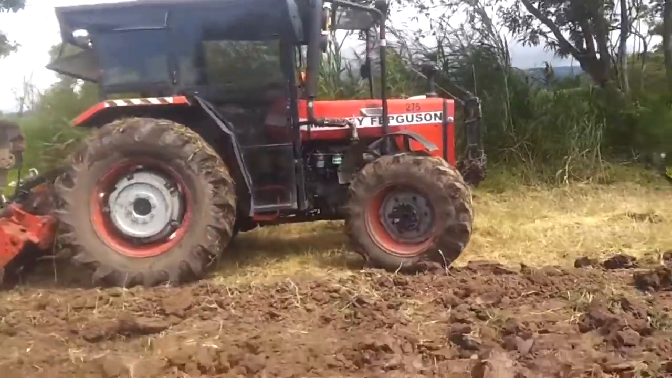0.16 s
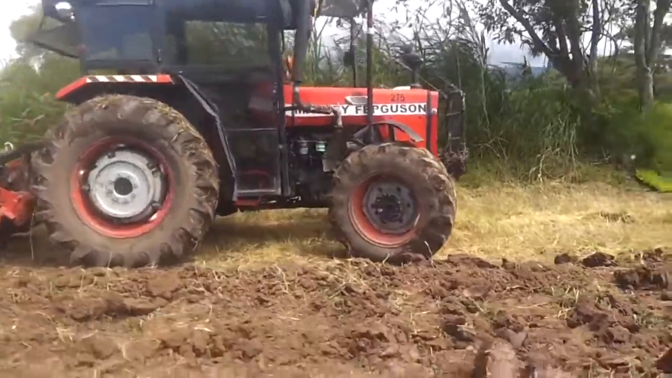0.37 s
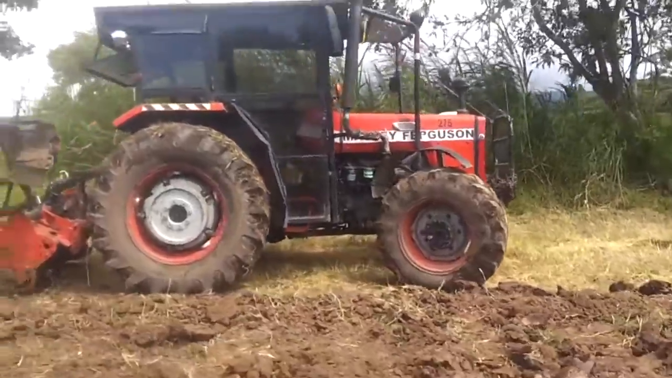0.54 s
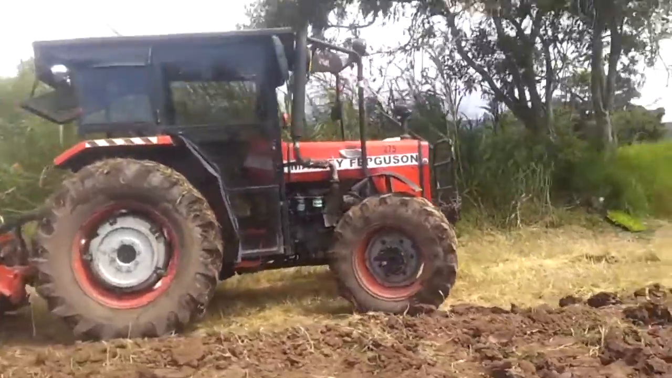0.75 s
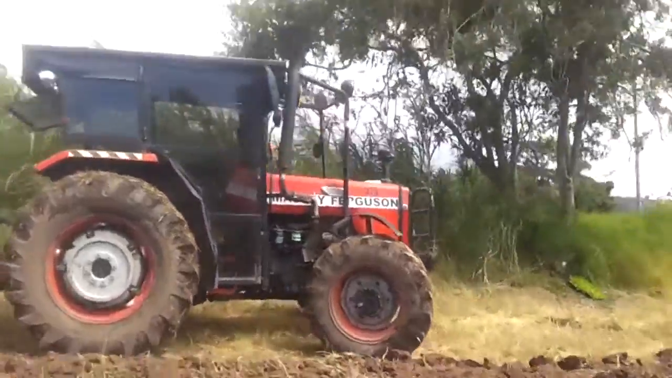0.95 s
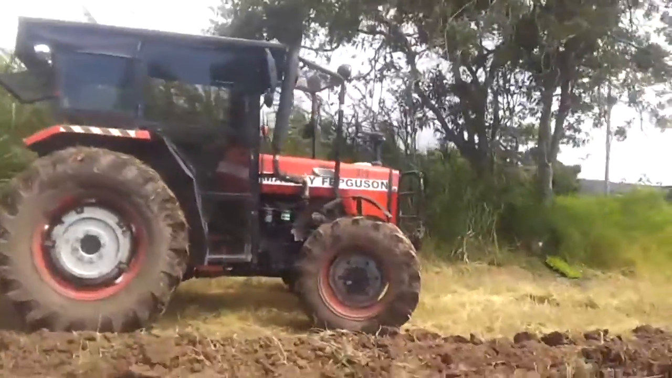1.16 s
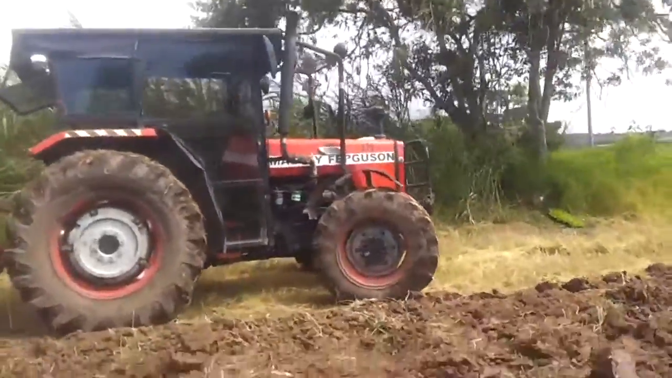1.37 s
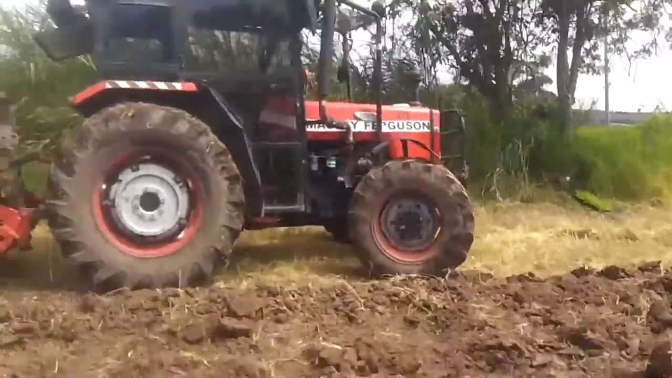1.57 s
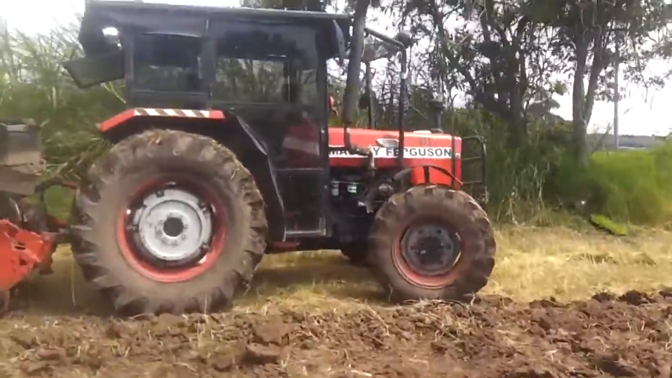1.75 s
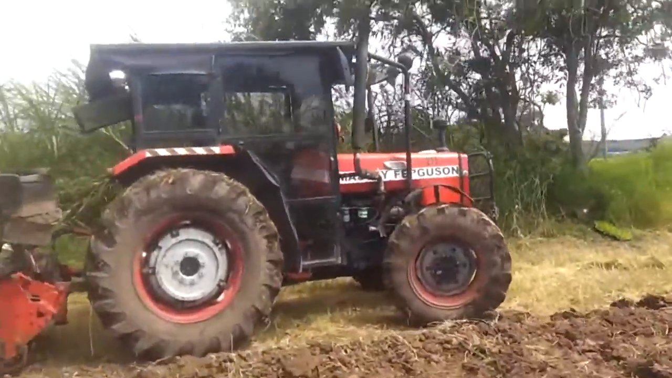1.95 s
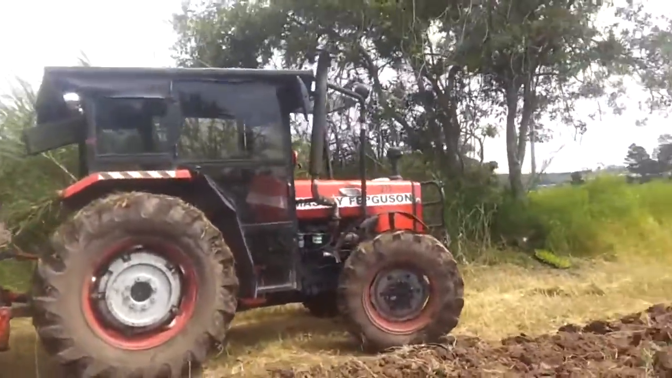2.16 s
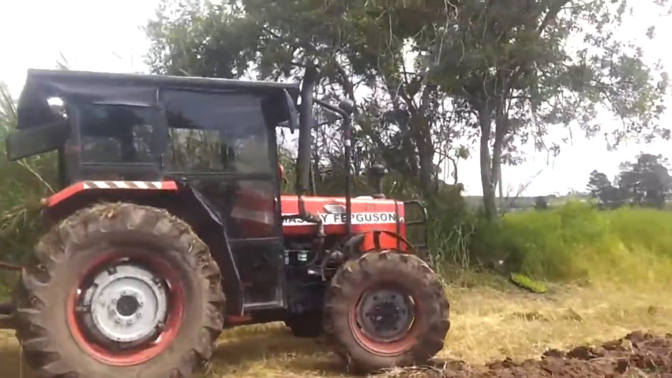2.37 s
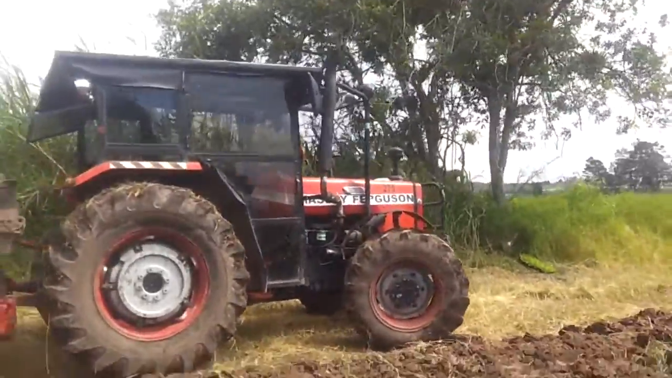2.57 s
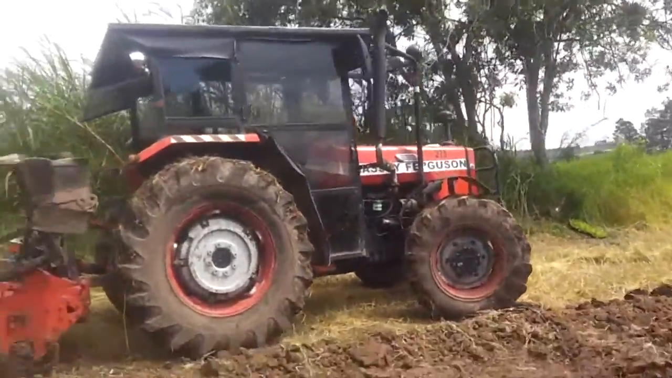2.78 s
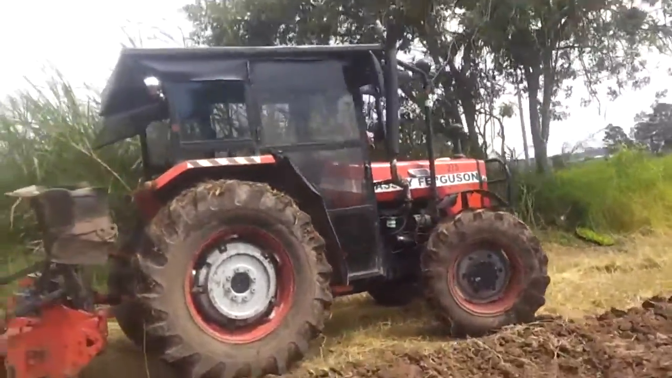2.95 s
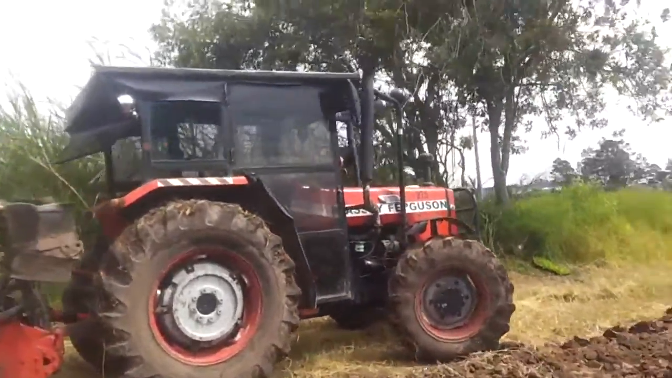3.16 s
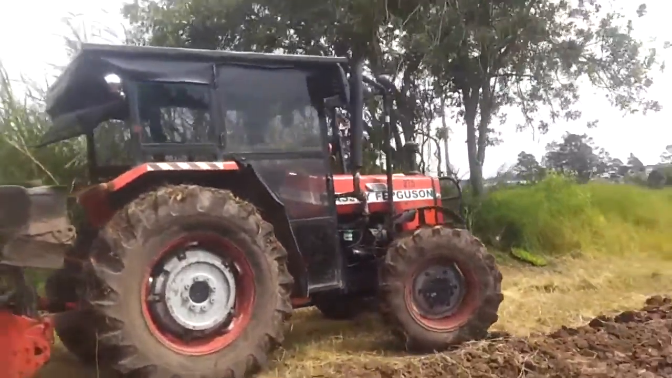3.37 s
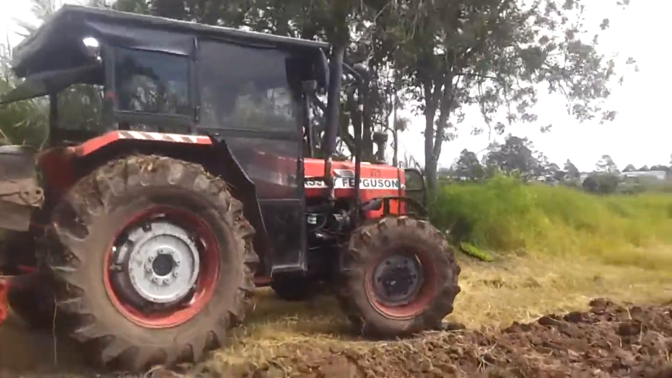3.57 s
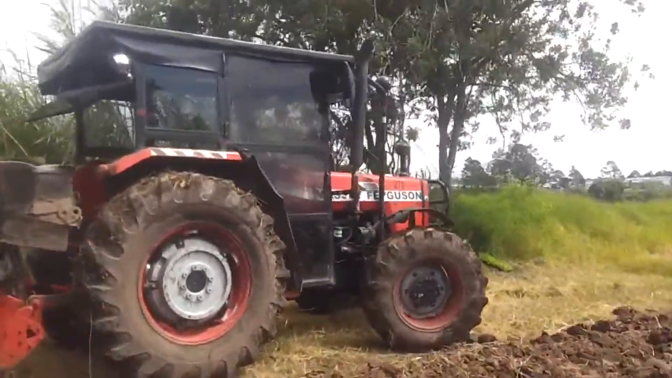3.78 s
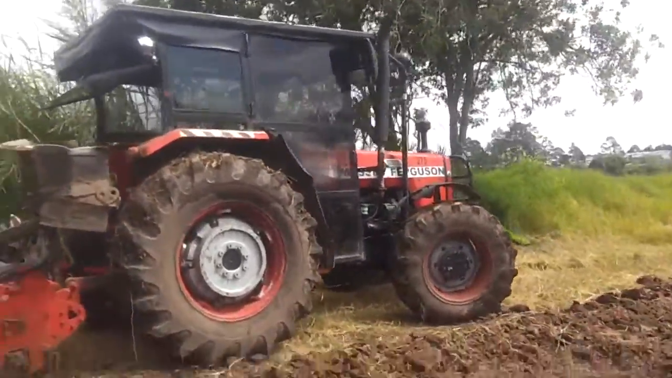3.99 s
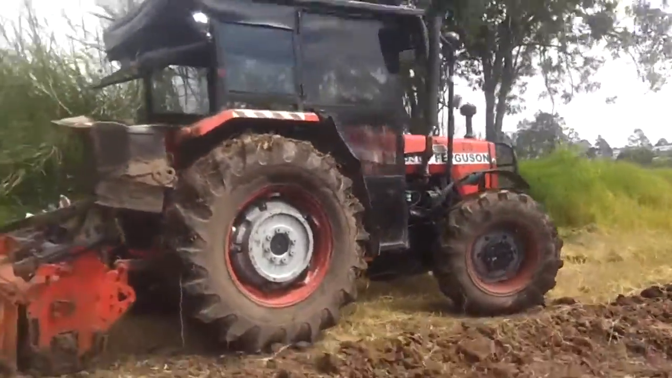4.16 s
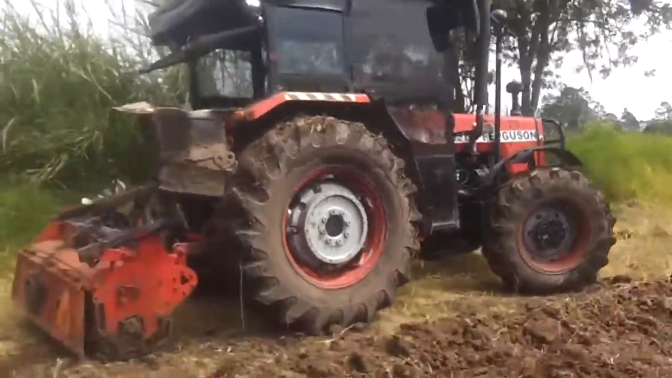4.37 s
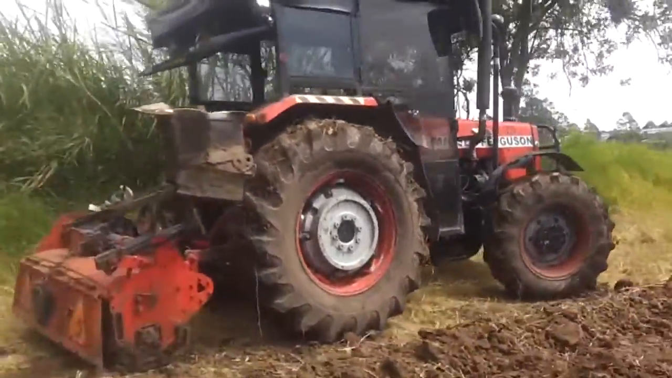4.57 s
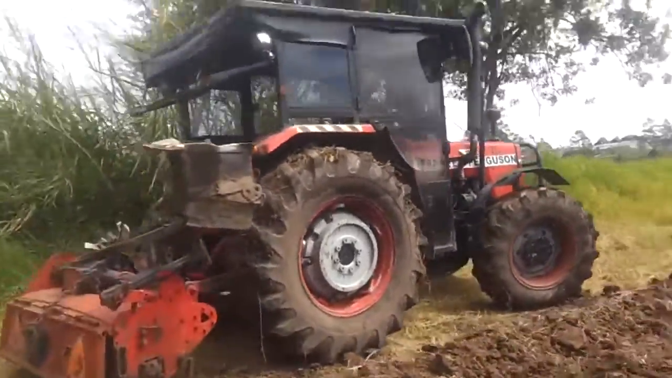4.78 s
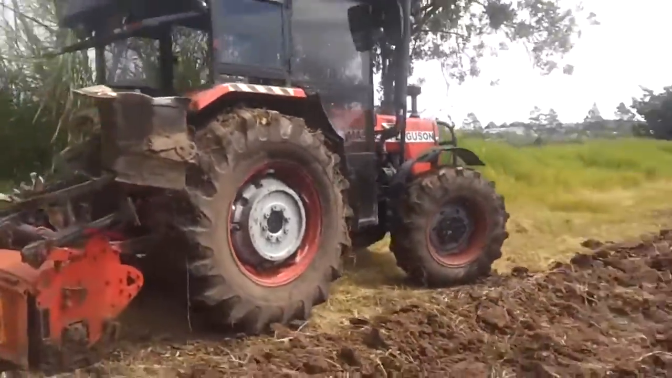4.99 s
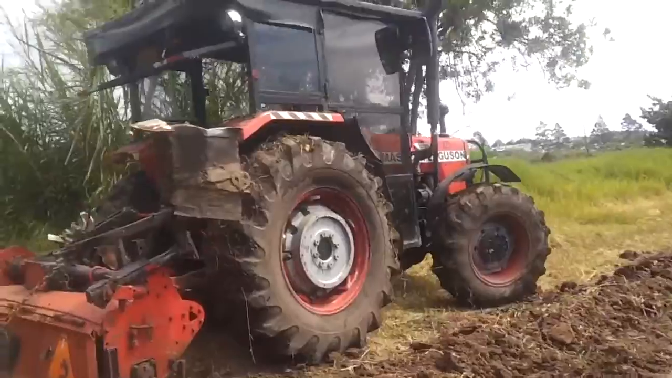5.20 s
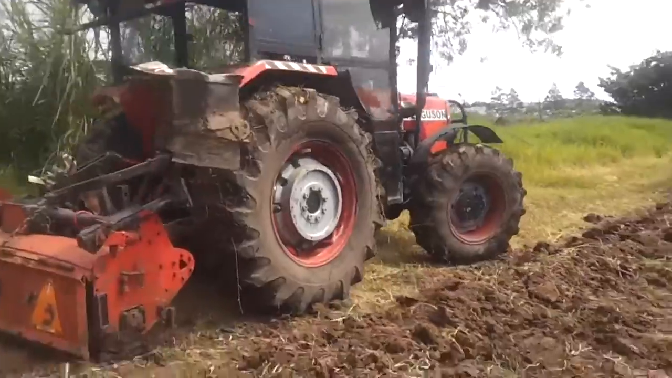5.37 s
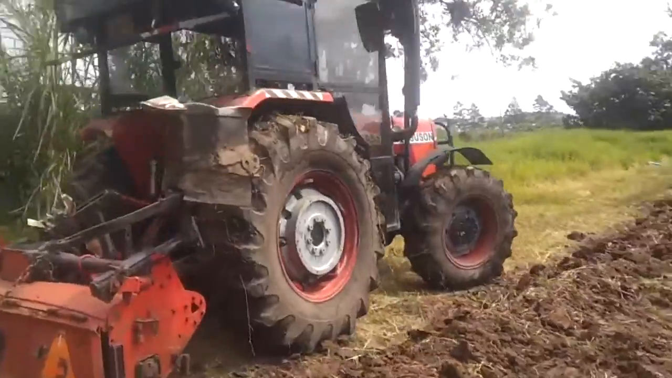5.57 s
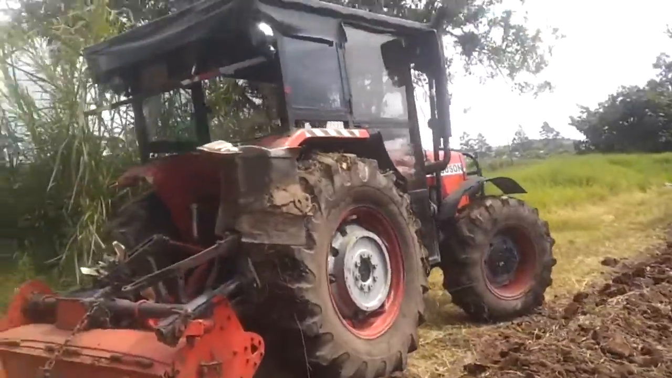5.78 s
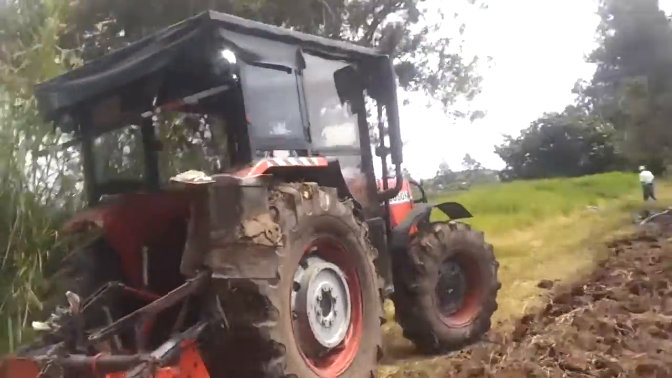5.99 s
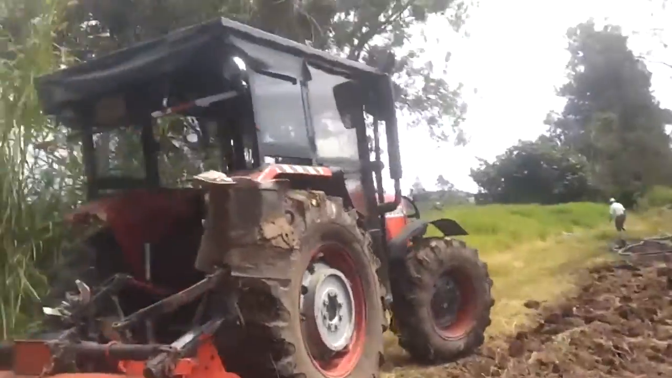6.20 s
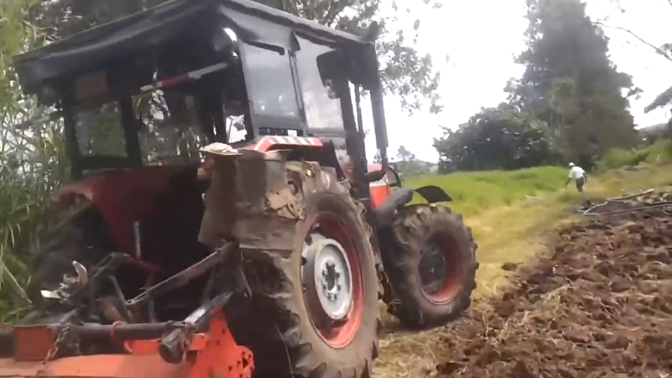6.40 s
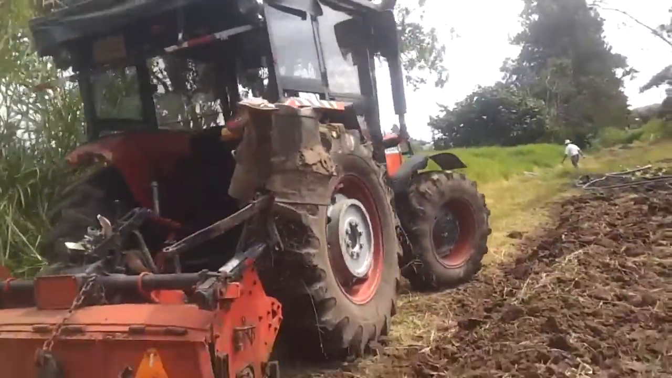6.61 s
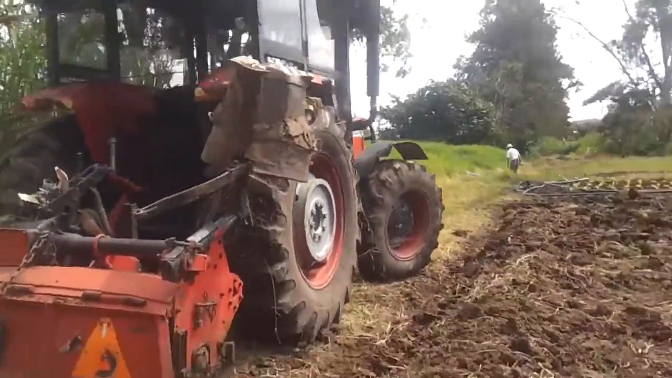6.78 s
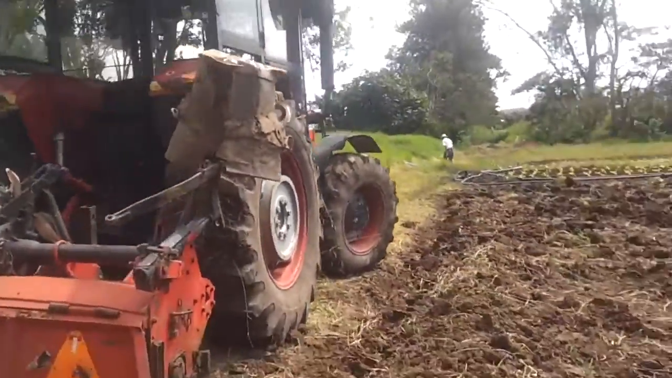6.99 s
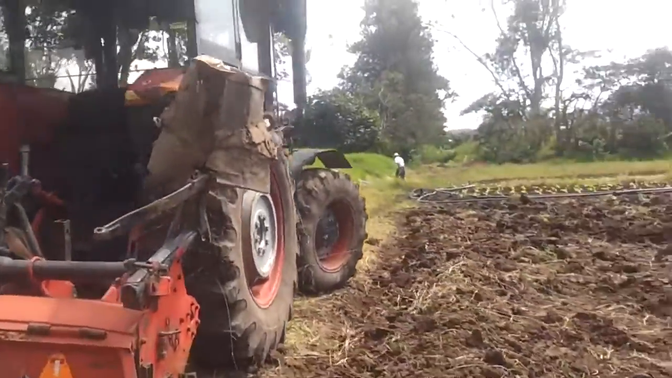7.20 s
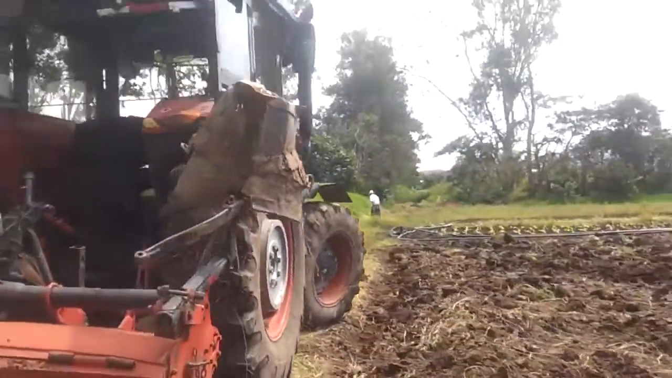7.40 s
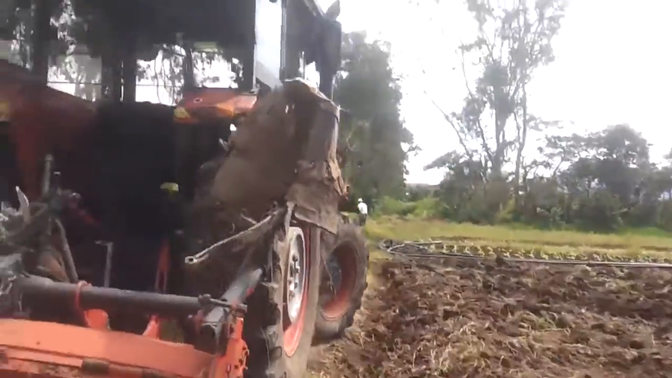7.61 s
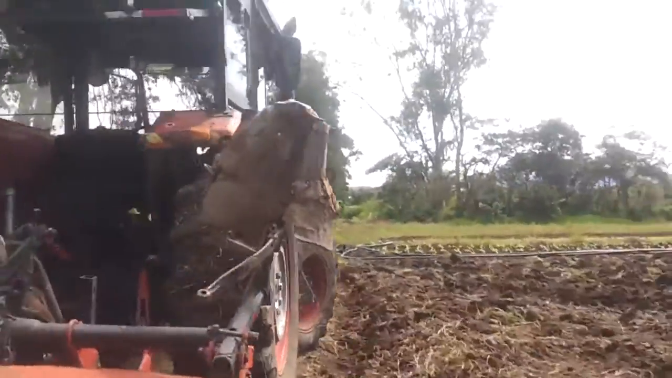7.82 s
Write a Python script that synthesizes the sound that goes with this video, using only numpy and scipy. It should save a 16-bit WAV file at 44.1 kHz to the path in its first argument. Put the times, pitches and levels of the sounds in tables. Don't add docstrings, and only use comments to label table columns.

```python
import sys
import numpy as np
from scipy import signal
from scipy.fft import rfft, irfft, next_fast_len
from scipy.io import wavfile
from scipy.ndimage import uniform_filter1d, map_coordinates

SR = 44100
rng = np.random.default_rng(int(sys.argv[2]) if len(sys.argv) > 2 else 0)


def ratio(d):
    e = np.asarray(d, float) / 20
    return 10 ** e


def master(y):
    cut = np.clip(np.atleast_2d(y).T, -1, 1)
    pcm = np.round(cut * 32767)
    wavfile.write(sys.argv[1], SR, pcm.astype(np.int16))


N = 346185

# f/Hz, left-right likeness/1
PORT_LIKENESS = [(60, .55), (130, .75), (280, .95), (620, .6), (1200, .7), (2200, .65), (4000, .5),
                 (8000, .25), (14000, .05)]
# f/Hz, level/dB per Hz
BUFFET_SPECTRUM = [(12, -54), (20, -31.5), (151, -0.5), (221, 1), (354, -6.5), (921, -24.5), (1050, -22.5),
                   (1350, -30.5), (1500, -35), (1950, -30), (3300, -120)]
# start t/s, length/s, level/dB, deep rumble over it/dB
LEFT_GUSTS = [(0, 0.066, -15, -9), (.16, 0.066, -18.5, 2), (.26, 0.12, -15, 2.5), (.41, 0.12, -21.5, -1),
              (.47, 0.17, -17, -10), (.68, 0.18, -19.5, -11), (.86, 0.18, -22.5, -9), (1.08, 0.22, -17, -9),
              (1.3, .12, -17, -4), (1.44, 0.095, -28.5, 13), (1.555, 0.22, -18.5, -3), (1.8, 0.36, -25, -3),
              (1.92, 0.074, -28, -29), (2.27, 0.25, -22.5, 6), (2.49, 0.24, -21, 2.5), (2.76, 0.18, -23, 4),
              (2.96, 0.1, -21.5, 4.5), (3.13, 0.077, -18, 2), (3.24, 0.029, -18, 2),
              (3.3, 0.12, -26.5, -11), (3.54, 0.27, -23.5, 7), (3.79, 0.19, -26, 8), (3.97, 0.18, -28, 1),
              (4.17, 0.064, -25.5, 0), (4.31, 0.073, -26, 6.5), (4.46, 0.18, -31, 4),
              (4.65, 0.088, -31.5, 3), (4.8, 0.081, -26.5, -4), (4.95, 0.093, -33, 7.5),
              (5.14, 0.048, -36, -8)]
RIGHT_GUSTS = [(.12, 0.11, -37, -1), (.28, 0.092, -34, -7), (.4, 0.093, -27.5, 0), (.54, 0.47, -27, -15),
               (1.0, 0.14, -34, 2), (1.26, 0.24, -34.5, -3), (1.55, 0.14, -32.5, -41),
               (1.75, 0.093, -28.5, -6), (1.89, 0.075, -27, -10), (2.05, 0.36, -28.5, -6),
               (2.45, 0.061, -25.5, -1), (2.56, 0.35, -29.5, -7), (2.97, 0.31, -31, -5),
               (3.28, 0.14, -33.5, 4), (3.47, 0.15, -33.5, 3), (3.7, 0.29, -29, -9), (3.96, 0.13, -30, -6),
               (4.18, 0.13, -24.5, -7), (4.33, .08, -39, 9), (4.44, 0.17, -45, 16), (4.6, 0.25, -34.5, -5)]
# t/s, peak level/dB, f/Hz
LEFT_POPS = [(0.02, -5, 510), (0.111, 3, 815), (0.29, -4, 305), (0.515, -6, 363), (0.548, 1.5, 563),
             (0.609, -2, 427), (0.713, -6.5, 338), (0.832, -5.5, 380), (1.12, -1, 303), (1.156, -5, 338),
             (1.192, 6, 335), (1.236, -11, 370), (1.256, 7, 550), (1.326, -1.5, 950), (1.456, 2.5, 227),
             (1.476, -0.5, 550), (1.561, -2, 420), (1.732, -6, 387), (2.53, -3, 307), (2.581, -4.5, 365),
             (2.87, -2.5, 307), (2.902, -4, 400), (2.993, -5.5, 263), (3.255, -7, 260), (3.568, -7, 263),
             (3.696, -4.5, 340), (3.808, -7, 426), (3.922, -5, 504), (4.193, -7.5, 311), (4.889, -3.5, 547)]
RIGHT_POPS = [(0.44, -9, 348), (0.463, -10, 291), (0.652, -10.5, 367), (0.749, -10, 302), (1.28, -22, 345),
              (1.933, -11.5, 373), (2.199, -14.5, 440), (3.428, -5.5, 390), (3.724, -9, 315),
              (3.88, -9, 295), (4.051, -15, 278), (4.225, 1, 274), (4.274, -12.5, 371), (4.358, -10.5, 270),
              (4.494, -10, 230)]
# t/s, peak level/dB, f/Hz
LEFT_EDDIES = [(0.071, -8, 320), (0.12, -8, 520), (0.178, -7, 292), (0.205, -10.5, 420), (0.27, -9, 460),
               (0.301, -12, 302), (0.324, -15, 368), (0.345, -10, 258), (0.362, -15, 400),
               (0.381, -10, 490), (0.425, -11.5, 417), (0.458, -12, 370), (0.5, -6.5, 350),
               (0.636, -7.5, 290), (0.727, -4.5, 420), (0.812, -9, 347), (0.989, -12.5, 330),
               (1.142, -9, 420), (1.18, -10, 400), (1.209, -2, 385), (1.273, -4, 480), (1.354, -7.5, 380),
               (1.368, -13, 250), (1.404, -6.5, 308), (1.492, -11, 410), (1.514, -12, 370),
               (1.594, -10.5, 280), (1.653, -6, 445), (1.665, -7, 533), (1.693, -9, 324), (1.77, -8, 298),
               (2.014, -15, 300), (2.279, -15, 260), (2.307, -9, 270), (2.327, -12, 300),
               (2.356, -7.5, 310), (2.41, -10, 318), (2.431, -9.5, 310), (2.51, -9, 260), (2.546, -11, 430),
               (2.559, -7.5, 312), (2.606, -11.5, 460), (2.649, -9.5, 297), (2.709, -15, 304),
               (2.729, -4, 372), (2.839, -11, 270), (2.93, -12, 260), (3.026, -13, 330), (3.059, -10, 316),
               (3.165, -8, 240), (3.178, -11, 294), (3.641, -10, 312), (3.67, -10, 310), (3.735, -9.5, 250),
               (3.757, -10, 300), (3.904, -11, 370), (4.065, -14, 316), (4.534, -15, 240)]
RIGHT_EDDIES = [(0.164, -20, 300), (0.475, -14, 280), (0.587, -25, 290), (0.734, -22, 370),
                (0.766, -17, 340), (0.883, -22, 330), (0.902, -16, 290), (1.357, -17, 390),
                (1.392, -19, 300), (1.612, -18, 330), (1.753, -22, 270), (2.082, -20, 340),
                (2.128, -20, 362), (2.166, -20, 230), (2.184, -20, 370), (2.336, -20, 320),
                (2.457, -17, 330), (2.496, -13, 330), (2.596, -24, 290), (2.614, -15, 300),
                (2.669, -18, 310), (2.73, -13, 373), (2.763, -18, 330), (2.787, -17, 290),
                (2.901, -19, 290), (3.149, -19, 320), (3.217, -19, 280), (3.309, -19, 370),
                (3.845, -17, 260), (3.907, -15, 390), (3.988, -19, 390), (4.202, -14, 330),
                (4.213, -14, 320), (4.512, -16, 330), (4.689, -21, 270), (4.819, -15.5, 290)]
# t/s, peak level/dB, f/Hz
LEFT_SNAPS = [(.167, -15, 1000), (.271, -11, 800), (.342, -10, 1800), (.425, -13, 800), (1.654, -10, 750),
              (2.606, -13, 750), (3.72, -14, 750), (1.316, -6, 2600), (1.326, -4, 2600), (1.354, -19, 900),
              (1.453, -12, 1200), (1.476, -14, 1300), (3.922, -9, 1300), (4.888, -16, 1500)]
# t/s, half length/s, level/dB, port (0 left, 1 right)
OVERLOAD_BLASTS = [(0.116, 0.016, -1, 0), (0.291, 0.019, -17, 0), (0.343, 0.0077, -3, 0),
                   (0.539, 0.0061, -1.5, 0), (0.612, 0.005, -7, 0), (0.728, 0.015, -10, 0),
                   (1.145, 0.027, -12, 0), (1.19, 0.012, 1.5, 0), (1.232, 0.011, -5, 0),
                   (1.255, 0.0078, 6, 0), (1.318, 0.0073, -3.5, 0), (1.488, 0.039, -15.5, 0),
                   (1.563, 0.016, -11, 0), (3.909, 0.029, -12, 0), (4.213, 0.013, -14.5, 1),
                   (0.432, 0.012, -14, 1)]
# f/Hz, level/dB per Hz
BLAST_SPECTRUM = [(60, -73), (200, 4), (400, 7.5), (800, -2.5), (1500, -13.5), (3000, -29), (6000, -48)]
# t/s, turns gained on a steady rate/1
CRANK_LAG = [(0, -0.18), (2, -0.34), (4, -0.35), (5.5, -0.4), (7, -.62), (7.85, -0.54)]
# t/s, exhaust level/dB, ringing/dB, soil hiss/dB, block over clatter/dB
TURNING_AWAY = [(0, -49, -3.5, -2.5, 7.5), (1.5, -42.5, 2, -2, 3.5), (3, -47, -2.5, -1.5, 5),
                (3.7, -39.5, -3.5, -2, 4.5), (4.3, -45.5, -5, 0, 8), (5, -40.5, -5.5, 0.5, 6.5),
                (5.5, -41.5, -10, 1, 6.5), (6.5, -41, -14, 0.5, 6.5), (7.2, -43.5, -7, 2, 8),
                (7.85, -40, -7, -1.5, 5)]
# t/s, clatter level/dB
PASSING_LEVEL = [(0, -46.5), (.7, -41), (1.5, -42), (2.4, -39), (3.4, -39.5), (4.5, -41), (5.3, -41),
                 (5.9, -41.5), (6.9, -41.5), (7.85, -40.5)]
# t/s, level/dB
CLATTER_SWINGS = [(.25, 5.5), (.47, 4.5), (.81, 5), (1.07, 4.5), (1.45, 3.5), (1.93, 2), (2.2, -2),
                  (2.32, 1.5), (2.82, 1.5), (2.93, -2.5), (3.28, 0.5), (3.6, 0.5), (3.72, -2), (4.25, -0.5),
                  (4.5, 1.5), (4.7, 2), (4.86, -4), (5.02, -1), (5.12, 0), (5.25, 1.5), (5.88, -0.5),
                  (6.6, 0), (7.02, 0.5), (7.12, -1.5), (7.24, 0), (7.53, 1)]
# f/Hz, level/dB per Hz
EXHAUST_SPECTRUM = [(18, -69), (30, -68), (68, -12.5), (129, -15.5), (256, -8), (293, -5.5), (356, -2.5),
                    (488, -10.5), (600, -8.5), (800, -11.5), (1040, -65), (1760, -120)]
BLOCK_SPECTRUM = [(350, -37), (600, -17), (654, -6), (748, -30), (804, -1.5), (857, -3.5), (1050, -6),
                  (1170, -8), (1390, -5.5), (1510, -6), (2100, -5), (2600, -11), (3300, -14.5), (4290, -20),
                  (7260, -120)]
CLATTER_SPECTRUM = [(1590, -8), (2700, 0), (3280, -5), (3640, -0.5), (4500, -1), (6470, 0), (9120, -6.5),
                    (12000, -20), (15600, -35), (22000, -120)]
# f/Hz, level/dB per Hz
HISS_SPECTRUM = [(1590, -7), (2700, -15), (3240, -6), (4000, -4), (4290, -2), (5480, -2.5), (7620, -2),
                 (13300, -14.5), (14400, -16)]
# f/Hz, width/Hz, side level/dB, rear level/dB, left minus right/dB, every second turn/dB
STEEL_MODES = [(1050, 65, -11, 3, -4, 6), (1430, 70, -8, -11, -3, 0), (1680, 70, -13, -6, 0, -4),
               (2080, 130, -5, -8, 5, 0), (2820, 90, -14, -13, -3, 0), (4270, 50, -20, -10, 0, 2)]
# f/Hz, left minus right level/dB
PORT_BALANCE = [(60, -4), (91, 0), (140, -1), (210, 1.5), (320, -0.5), (490, 1.5), (740, 2.5), (1130, -10),
                (1720, 1), (2610, -1), (3970, -2.5), (6040, 3), (9190, -5.5), (14000, -10)]
# f/Hz, left lead/rad
PORT_LEAD = [(430, 0), (800, -1.4), (1350, .6), (2000, -.6), (2600, -.4), (4000, 0)]
# t/s, delay of the left port/ms
LEFT_DELAY = [(0, 0.38), (.8, 0.37), (1.2, -0.058), (3.5, -0.034), (4.7, -0.082), (6.2, -0.049),
              (6.7, 0.061), (7.85, 0.076)]
# t/s, treble level/dB
BODY_SHADE = [(0, 2), (2, 5), (4, 6), (5, 3.5), (7.85, 3)]
# f/Hz, level needed over the usual/dB
LINE_BAR = [(7000, -80), (7800, -9), (9000, -2), (9800, 1), (11000, 4), (12500, 7), (14300, 8.5)]

CRANK_HZ = 18.8
SWING_S, BLOCK_SHARE = 0.059, 1
GUST_RISE_S, GUST_FALL_S = 0.025, 0.03
SWIRL_OVER_DB, SWIRL_HZ = 3.5, 310
DEEP_HZ = 129
SHADE_HZ = 11000
CLIP_DB = -5.9
DUCK_FROM_DB, DUCK_SLOPE, DUCK_HOLD_S = -19, 1, 0.064
FRAME, GRID, TOP_HZ = 1024, 579, 14570
RIGHT_BAR_DB = -5.5


def unit(x):
    return x / np.sqrt(np.mean(x ** 2) + 1e-20)


def along(points, hz):
    f, v = np.transpose(points)
    return np.interp(np.log(hz + 1), np.log(f + 1), v)


def curves(rows):
    s, *cols = np.transpose(rows)
    return np.array([np.interp(np.arange(N) / SR, s, c) for c in cols])


def wobble(rate):
    knots = rng.standard_normal(int(N * 200 / SR) + 4)
    return map_coordinates(knots, [np.arange(N) * rate / SR])


def filtered(x, response):
    m = next_fast_len(N + SR // 4)
    return irfft(rfft(x, m) * response(np.fft.rfftfreq(m, 1 / SR)), m)[..., :N]


def pair():
    def split(hz):
        turn = np.arccos(np.clip(along(PORT_LIKENESS, hz), -1, 1)) / 2
        return np.array([np.cos(turn), np.sin(turn)])

    mid, side = filtered(rng.standard_normal((2, N)), split)
    return np.array([mid + side, mid - side])


def gusts(table):
    t = np.arange(N) / SR
    power = 1e-12
    for s, length, db, deep_db in table:
        rise = 1 + np.tanh((t - s) / GUST_RISE_S)
        fall = 1 - np.tanh((t - s - length) / GUST_FALL_S)
        power = power + ratio([[2 * db], [2 * (db + deep_db)]]) * rise * fall / 4
    return np.sqrt(power)


def swirls(strength, count):
    when = rng.random(count) * (N - 1)
    size, pitch = rng.standard_normal((2, count))
    carrier_db = 20 * np.log10(strength[when.astype(int)])
    peak_db = carrier_db + SWIRL_OVER_DB + 1.5 * np.clip(size, -2, 1)
    return np.transpose([when / SR, peak_db, SWIRL_HZ * np.exp(0.23 * np.clip(pitch, -2, 1))])


def pops(table, cycles, edge):
    out, t = np.zeros(N + 1200), np.arange(-600, 600) / SR

    def push(t, hz, turn):
        return np.exp(-(t * hz / cycles) ** 2) * np.cos(2 * np.pi * hz * t + turn)

    for (s, db, hz), turn in zip(table, rng.normal(0, .9, len(table))):
        front = push(t + 0.16 / hz, 1.71 * hz, turn)
        out[round(s * SR):][:len(t)] += ratio(db - 1.0) * (push(t, hz, turn) + edge * front)
    return out[600:][:N]


def surges():
    level, t = np.zeros((2, N)), np.arange(N) / SR
    for s, half, db, port in OVERLOAD_BLASTS:
        level[round(port)] += ratio(db - 8.0) * np.exp(-((t - s) / half) ** 2)
    noise = rng.standard_normal((2, N))
    return level * unit(filtered(noise, lambda hz: ratio(along(BLAST_SPECTRUM, hz))))


def wind():
    lumps = ratio([3 * wobble(70) + 1.4 * wobble(22.04) for port in range(2)])
    chance, size = rng.random((2, N)), rng.standard_normal((2, N))
    hail = unit((chance < 160 / SR) * ratio(4 * size))
    rough = lumps * (.7 * size + .5 * hail)
    buffet = unit(filtered(rough, lambda hz: ratio(along(BUFFET_SPECTRUM, hz))))
    deep = filtered(buffet, lambda hz: 1 / (1 + (hz / DEEP_HZ) ** 4))
    strength, rumble = np.transpose([gusts(LEFT_GUSTS), gusts(RIGHT_GUSTS)], (1, 0, 2))
    left_strong = pops(LEFT_POPS, cycles=.6, edge=.4) + pops(LEFT_SNAPS, cycles=.35, edge=0)
    strong = np.array([left_strong, pops(RIGHT_POPS, cycles=.7, edge=.4)])
    carried = [pops(swirls(port, count=90), cycles=.65, edge=.3) for port in strength]
    lesser = [pops(table, cycles=.75, edge=.3) for table in (LEFT_EDDIES, RIGHT_EDDIES)]
    flutter = ratio(-1.0) * strength * (buffet - deep)
    return flutter + rumble * deep + strong + carried + surges() + lesser


def bursts(start, rise, fall, scatter_db, second_db=0):
    turns = CRANK_HZ * np.arange(N) / SR + curves(CRANK_LAG)[0] - start + 2
    since, count = turns % 1, turns.astype(int)
    scatter = scatter_db * np.clip(rng.standard_normal(200), -2, 2)[count]
    size = ratio(scatter + second_db * (-1) ** count)
    return unit(size * (1 - np.exp(-since / rise)) * np.exp(-(since / fall) ** 1.3))


def part(spectrum, burst, steady, grain_db):
    grit = ratio(grain_db * wobble(190))
    return unit(filtered((steady + burst) * grit * pair(), lambda hz: ratio(along(spectrum, hz))))


def ringing():
    out, noise, behind = 0, pair(), np.arange(N) / N
    for hz, width, side_db, rear_db, pan_db, second_db in STEEL_MODES:
        blow = bursts(start=-.22, rise=.08, fall=.25, scatter_db=1.5, second_db=second_db)
        strike = np.maximum(np.diff(blow, prepend=0), 0)
        mode = lambda f: 1j * f * width / (hz * hz - f * f + 1j * f * width)
        level = side_db + (rear_db - side_db) * behind + np.array([[pan_db / 2], [-pan_db / 2]])
        rough, clean = unit(filtered((.3 + blow) * noise, mode)), unit(filtered(strike, mode))
        out = out + ratio(level) * (.75 * rough + .4 * clean)
    return out


def exhaust():
    puff = bursts(start=-.3, rise=0.065, fall=0.11, scatter_db=6.0)
    push = np.diff(puff, 2, prepend=[0, 0])
    thump = unit(filtered(push, lambda hz: ratio(along(EXHAUST_SPECTRUM, hz))))
    return 0.97 * part(EXHAUST_SPECTRUM, puff, steady=7.4, grain_db=2.5) + 0.34 * thump


def engine():
    exhaust_db, ring_db, hiss_db, over_db = curves(TURNING_AWAY)
    t = np.arange(N) / SR
    swing_db = sum(db * np.exp(-((t - s) / SWING_S) ** 2) for s, db in CLATTER_SWINGS)
    near_db = curves(PASSING_LEVEL)[0]
    clatter_db = near_db + swing_db
    block_db = near_db + over_db + BLOCK_SHARE * swing_db
    knock = bursts(start=-.24, rise=.15, fall=.38, scatter_db=1.3)
    tick = bursts(start=-.36, rise=.06, fall=.25, scatter_db=1.4)
    body = part(BLOCK_SPECTRUM, knock, steady=1.15, grain_db=1.5)
    block = .55 * body + ratio(ring_db - 4) * ringing()
    clatter = 0.65 * ratio(-hiss_db) * part(CLATTER_SPECTRUM, tick, steady=0.59, grain_db=2.5)
    hiss = 0.75 * ratio(hiss_db) * part(HISS_SPECTRUM, tick, steady=11, grain_db=.5)
    bites_db = .6 * wobble(11)
    load = ratio(block_db - np.mean(block_db))
    heard = ratio(exhaust_db) * load * exhaust() + ratio(block_db) * block
    heard = heard + ratio(clatter_db + bites_db) * (clatter + hiss)

    def ports(hz):
        balance = ratio(np.outer([.5, -.5], along(PORT_BALANCE, hz)))
        return balance * np.exp(np.outer([.5j, -.5j], along(PORT_LEAD, hz)))

    return filtered(heard, ports)


def tractor():
    left, right = engine()
    treble = filtered(left, lambda hz: 1 / (1 + (SHADE_HZ / (hz + 1)) ** 8))
    left = left + (ratio(curves(BODY_SHADE)[0]) - 1) * treble
    delay = curves(LEFT_DELAY)[0] * SR / 1000
    return np.array([map_coordinates(left, [np.arange(N) - delay], mode="nearest"), right])


def ducking(loud):
    keep = np.exp(-1 / (DUCK_HOLD_S * SR))
    power = np.minimum(loud ** 2, ratio(2 * CLIP_DB)).max(0)
    level_db = 10 * np.log10(signal.lfilter([1 - keep], [1, -keep], power) + 1e-12)
    return ratio(-DUCK_SLOPE * np.maximum(uniform_filter1d(level_db, size=1500) - DUCK_FROM_DB, 0))


def scene():
    air = wind()
    return ducking(air) * tractor() + air


def overloaded(x):
    return x / (1 + np.abs(x / ratio(CLIP_DB)) ** 8) ** (1 / 8)


def thinned(x):
    n, k = np.arange(2 * FRAME)[:, None], np.arange(FRAME) + .5
    window = np.sin(np.pi * (n + .5) / (2 * FRAME))
    basis = window * np.cos(np.pi / FRAME * (n + .5 + FRAME / 2) * k) * np.sqrt(2 / FRAME)
    lead, hz = 2 * FRAME - GRID, k * SR / (2 * FRAME)
    padded = np.pad(x, ((0, 0), (lead, -(N + lead) % FRAME + FRAME)))
    blocks = padded.reshape(2, -1, FRAME)
    z = (np.concatenate([blocks[:, :-1], blocks[:, 1:]], axis=2) @ basis).transpose(0, 2, 1)
    usual = uniform_filter1d(np.abs(z).mean(2), size=17, axis=1)[..., None]
    usual = usual * ratio([[[0]], [[RIGHT_BAR_DB]]])
    bass_db = 20 * np.log10(uniform_filter1d(np.abs(z[:, :40]).mean((0, 1)), size=5) + 1e-6)
    patches = np.repeat(rng.standard_normal((2, 64, z.shape[2])), 16, axis=1)
    now = uniform_filter1d(np.abs(z[:, 300:480]).mean(1), size=7, axis=1)[:, None]
    bar_db = along(LINE_BAR, hz)[:, None] + .2 * (bass_db - bass_db.mean()) + 1.2 * patches
    step = 2 * usual * (now / now.mean(2, keepdims=True)) ** .8 * ratio(bar_db) + 1e-12
    lines = np.round(z / step) * step * (hz < TOP_HZ)[:, None]
    frames = lines.transpose(0, 2, 1) @ basis.T
    joined = frames[:, 1:, :FRAME] + frames[:, :-1, FRAME:]
    return joined.reshape(2, -1)[:, lead - FRAME:][:, :N]


def low_pass(x):
    return signal.sosfilt(signal.butter(12, 14570, fs=SR, output="sos"), x)


def record(dry):
    return low_pass(thinned(overloaded(dry)))


dry = scene()
out = record(dry)
master(out)
```